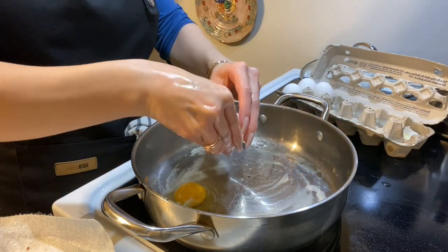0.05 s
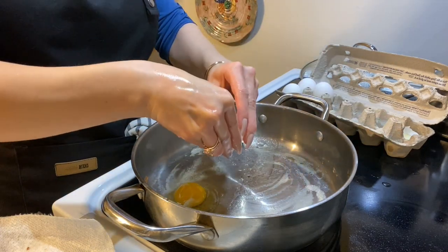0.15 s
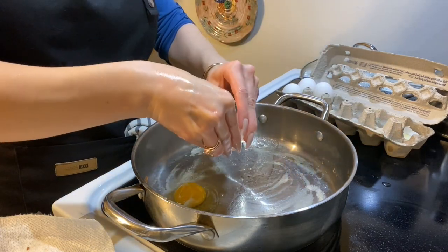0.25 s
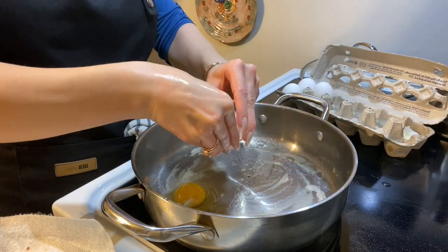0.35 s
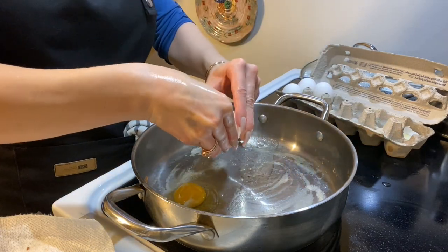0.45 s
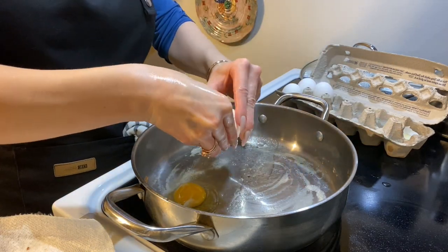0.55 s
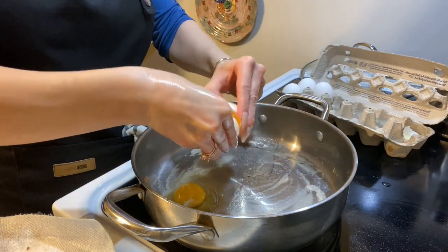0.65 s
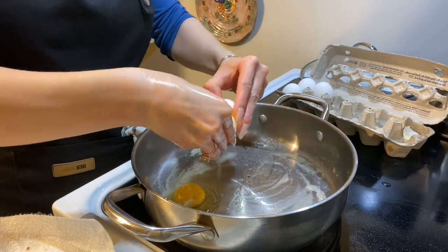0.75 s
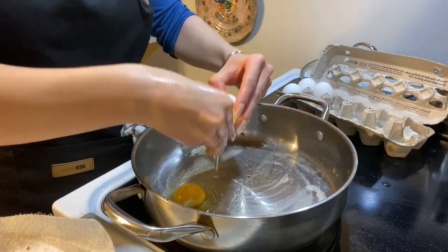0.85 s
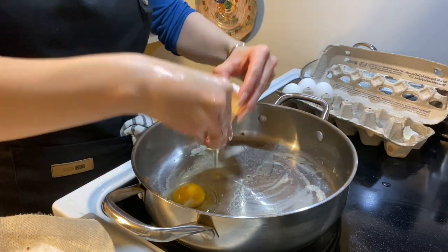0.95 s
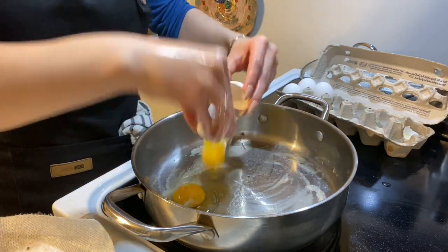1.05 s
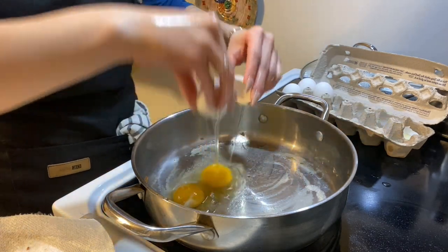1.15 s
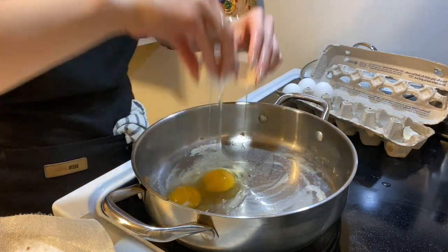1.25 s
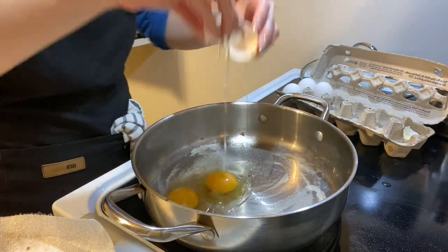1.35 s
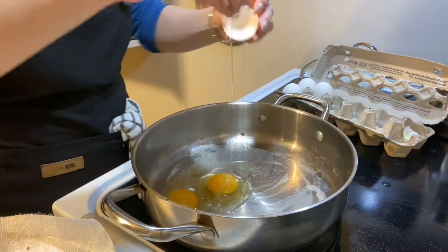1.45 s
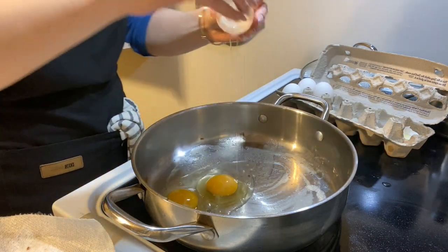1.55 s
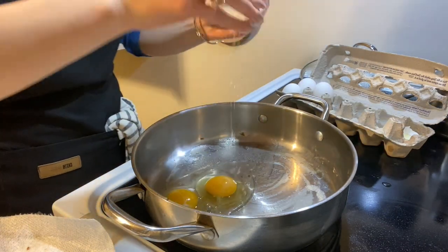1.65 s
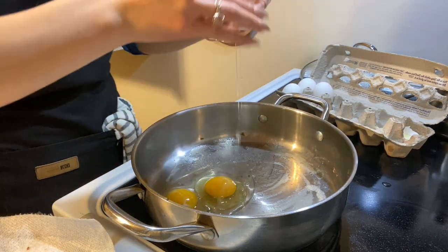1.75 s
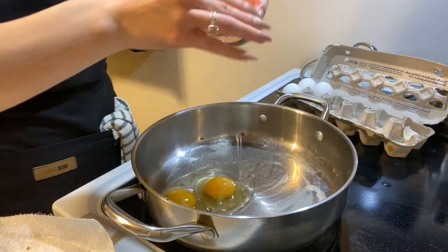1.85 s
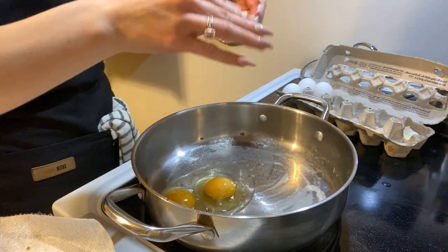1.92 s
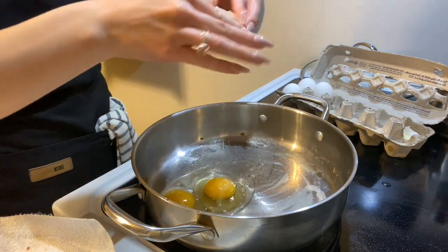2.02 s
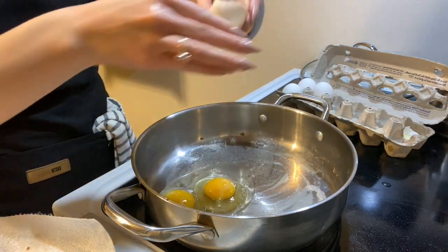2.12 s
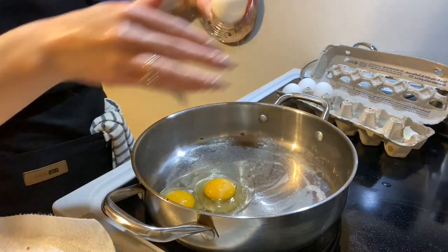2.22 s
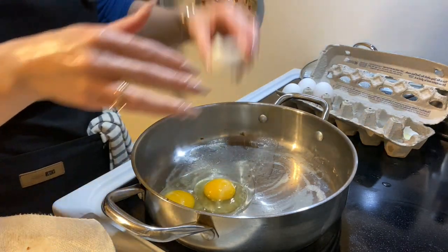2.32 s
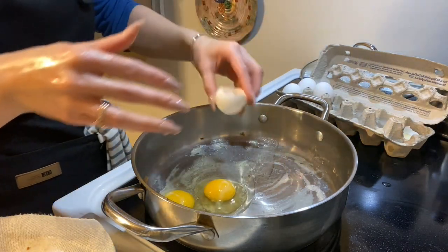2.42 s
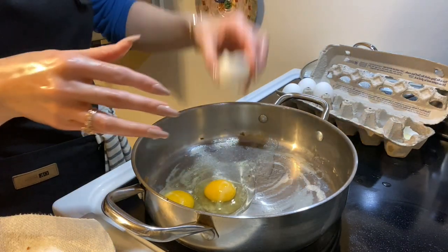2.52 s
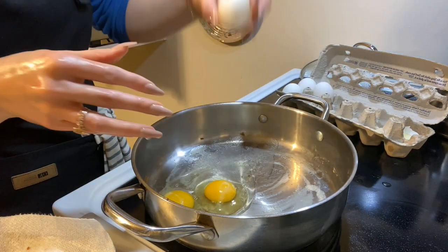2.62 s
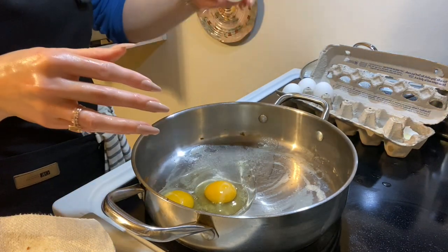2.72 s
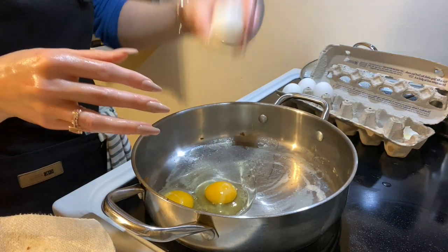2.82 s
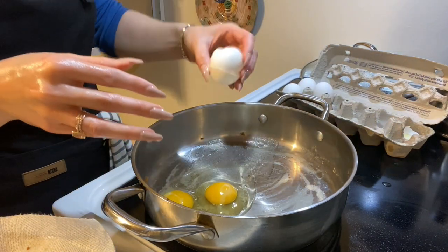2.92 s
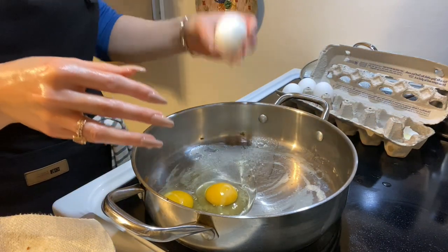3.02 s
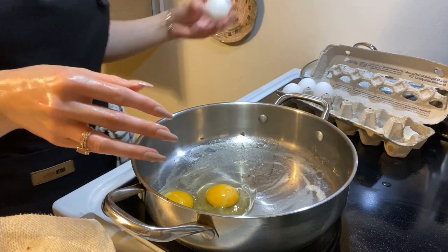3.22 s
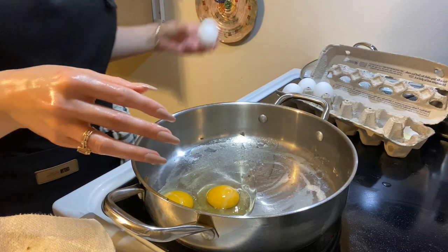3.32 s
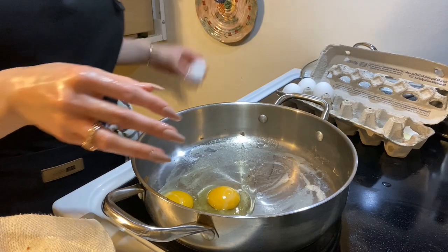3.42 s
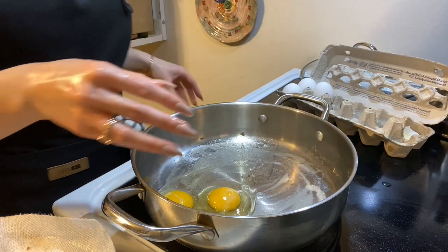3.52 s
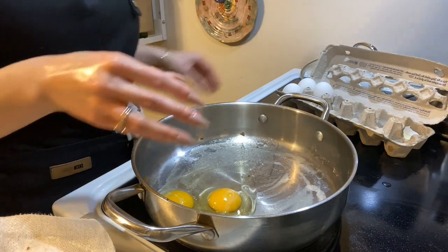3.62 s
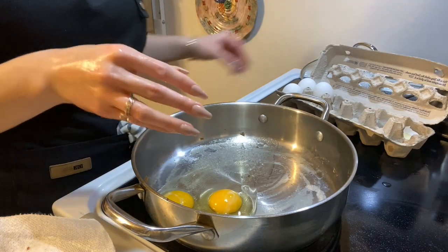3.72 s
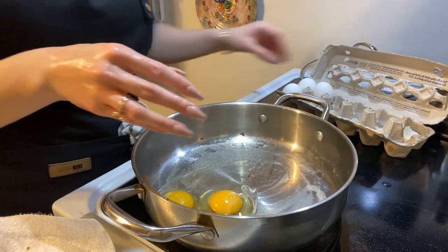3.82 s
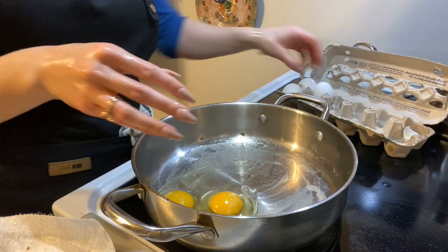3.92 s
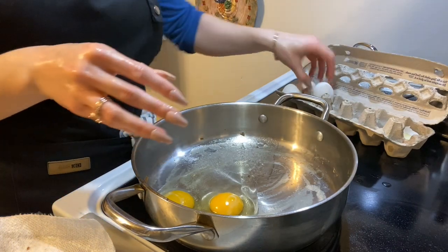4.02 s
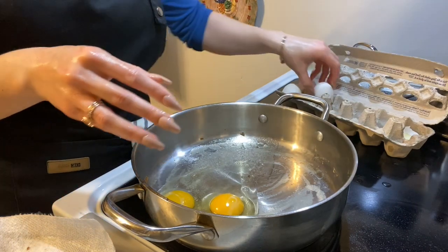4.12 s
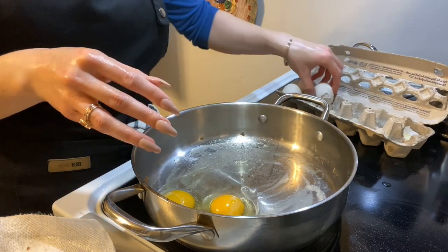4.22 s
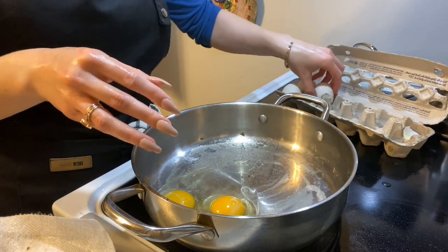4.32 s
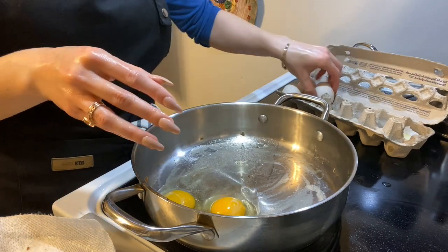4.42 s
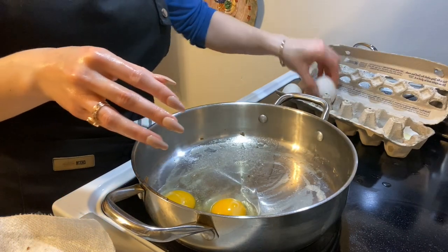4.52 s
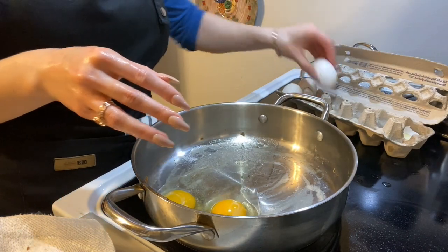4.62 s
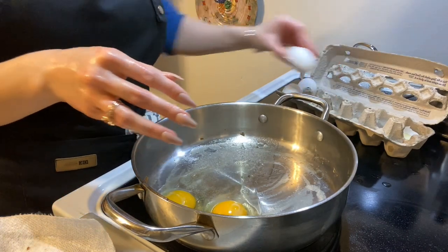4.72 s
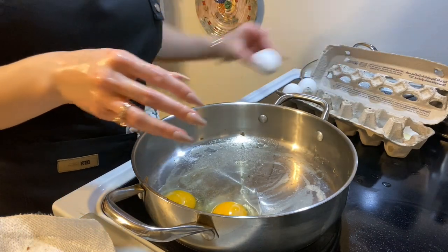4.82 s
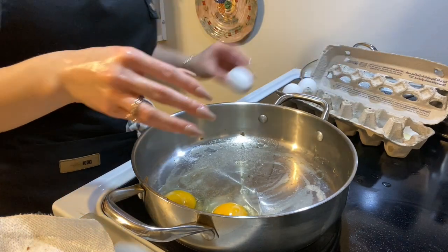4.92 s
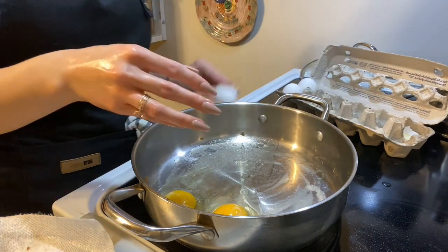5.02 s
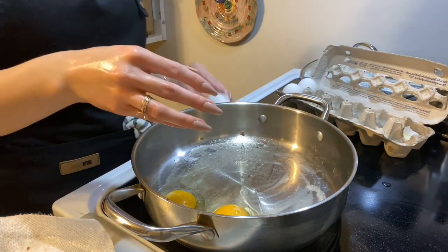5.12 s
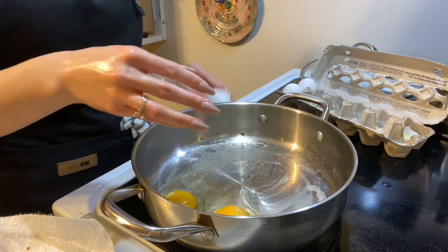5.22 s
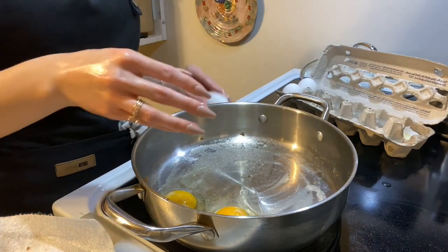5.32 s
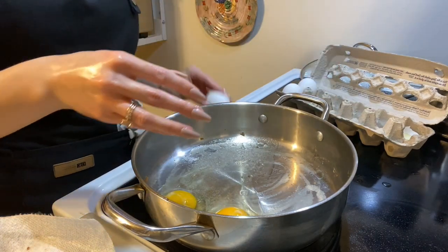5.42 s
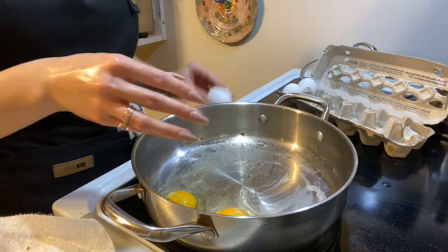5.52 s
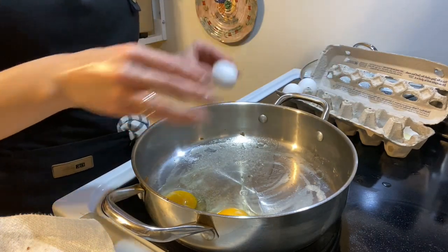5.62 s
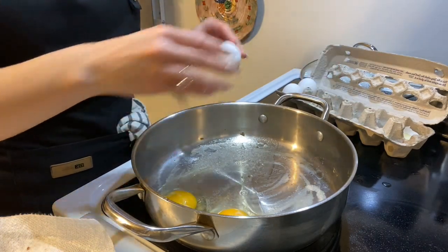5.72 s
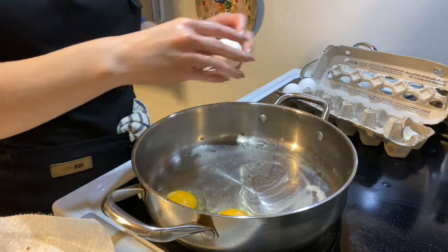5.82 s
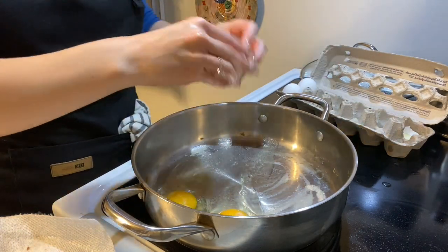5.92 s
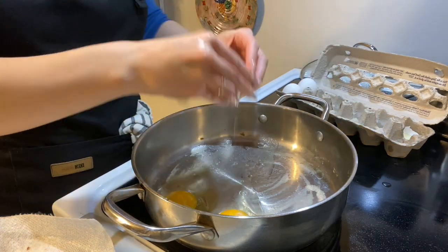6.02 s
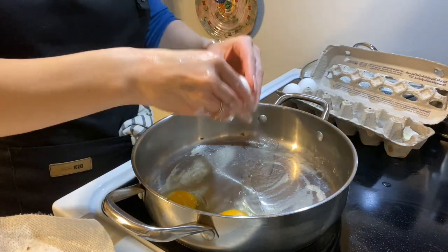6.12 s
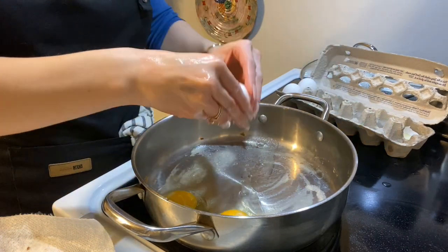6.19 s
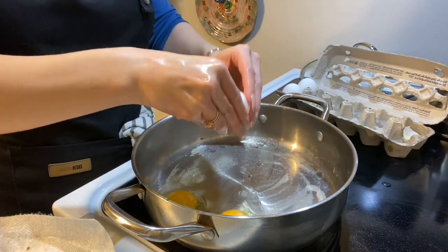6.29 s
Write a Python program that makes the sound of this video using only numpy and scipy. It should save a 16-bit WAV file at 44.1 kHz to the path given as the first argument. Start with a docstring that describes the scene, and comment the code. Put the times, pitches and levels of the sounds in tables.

```python
"""In a small kitchen with a faint hum, thumbs pull an eggshell open in brittle snaps over crackling noise.
The egg drops with damped plips, then the halves are nested with rubbing slips and small wet pops.
The shells clatter into a bin as noise bursts through its resonances; the next egg bumps out of its carton.
Three knocks on the stove edge crunch its shell, ring the pan and boom in the stove top; it starts to split.
Room air, hum and a dull rustle of handling lie under it all; a diffuse tail answers hands, knocks and bin."""
import sys
import numpy as np
from scipy import signal
from scipy.fft import rfft, irfft
from scipy.io import wavfile
from scipy.ndimage import uniform_filter1d

SR = 44100
rng = np.random.default_rng(int(sys.argv[2]) if len(sys.argv) > 2 else 0)


def pcm_store(signal):
    """Save signal as 16-bit PCM."""
    levels = np.round(np.clip(np.atleast_2d(signal), -1, 1) * 32767)
    wavfile.write(sys.argv[1], SR, levels.astype(np.int16).T)


N = 280035
SIZE = 8192  # samples in one blow
HZ = np.fft.rfftfreq(SIZE, 1 / SR)
TIME = np.arange(N) / SR

# shell splitting under the thumbs: t/s, level before trim/dB, shell resonance/Hz, tilt/(dB/octave), fade/s
SNAPS = [(0.0094, -33, 1310, -5.5, 0.0011), (0.276, -41, 1910, -2, 0.0021),
         (0.3223, -34, 1730, 0.5, 0.0017), (0.3558, -40.5, 1970, 0.5, 0.0031),
         (0.540, -35.5, 4000, 12.5, 0.00197), (0.557, -33.5, 5030, 4.5, 0.0026),
         (0.5739, -23.5, 2130, -2.5, 0.0014), (0.579, -32, 4040, -3.5, 0.003),
         (0.599, -30, 4450, 3, 0.0014), (0.6265, -17, 2070, -.5, 0.0015), (0.634, -37, 10430, 17, 0.0011),
         (0.827, -42.5, 1136, -2, 0.0049), (6.2453, -34.5, 1340, 3.5, 0.0035),
         (6.2717, -34, 10700, 6, 0.0021), (6.2968, -27.5, 11250, 3.5, 0.003)]
# one half pushed into the other, as rubbing strokes: peak t/s, level before trim/dB, build/s, fade/s
NESTING_STROKES = [(1.52, -50.5, 0.025, 0.045), (1.635, -41, 0.064, 0.035), (1.77, -46, 0.096, 0.0073),
                   (1.96, -48, 0.009, 0.011)]
# egg knocked on the stove edge: t/s, knock/dB, crunch/dB, stove boom before trim/dB, crunch fade/s,
# dent resonance/Hz, pan ring before trim/dB, pan tilt/(dB/octave)
EDGE_KNOCKS = [(5.0547, -9, -14, -22.5, 0.002, 2670, -23.5, 0.5),
               (5.2391, -26.5, -13.5, -25, 0.0016, 2060, -40, 1.5),
               (5.43, -30, -19.5, -25.5, 0.0022, 2330, -42, 0)]
# colour of splitting shell: f/Hz, level/dB
SPLIT_COLOUR = [(100, -27), (330, -6.5), (520, -12.5), (690, 7.5), (930, -17.5), (1400, -4), (1650, -5.5),
                (2150, -2), (2700, -6), (3950, -0.5), (6000, -2), (7800, 0.5), (11500, -11.5)]
# colour of the loose shell halves: f/Hz, level/dB
HALVES_COLOUR = [(200, -11), (1200, 1), (2000, 8.5), (3400, -2.5), (4400, -9.5), (5600, 0), (8000, -6),
                 (11500, -15)]


def amp(db):
    """Decibels to gain."""
    return 10 ** (np.asarray(db) / 20)


def unit(x):
    """Scales to rms 1."""
    return x / np.sqrt(np.mean(x ** 2) + 1e-20)


def read(points, hz):
    """Reads a table on a log-frequency axis."""
    f, value = np.transpose(points)
    return np.interp(np.log(hz + 1), np.log(f + 1), value)


def add(mix, s, sound):
    """Mixes a stereo sound in at time s."""
    part = mix[:, max(round(s * SR), 0):][:, :sound.shape[1]]
    part += sound[:, :part.shape[1]]


def drift(rate_hz):
    """Slow random wander of rms 1: noise with its content above rate_hz rolled off."""
    hz = np.fft.rfftfreq(N, 1 / SR)
    noise = rfft(rng.standard_normal(N))
    return unit(irfft(noise / (1 + (hz / rate_hz) ** 4), N))


def slope(tilt_db):
    """Brightens or dulls by so many dB an octave around 3 kHz, flat below 300 Hz."""
    return tilt_db * np.log2(np.maximum(HZ, 300) / 3000)


def lifts(peaks):
    """Raises a colour at each resonance (f/Hz, width/Hz, level/dB)."""
    return sum(db / (1 + (2 * (HZ - hz) / width) ** 2) for hz, width, db in peaks)


def causal(db):
    """Minimum-phase response of a body with this gain curve: it rings only after it is struck."""
    log_gain = np.log(amp(np.maximum(db - db.max(), -100)))
    mirrored = np.r_[log_gain, log_gain[-2:0:-1]]
    return np.exp(np.conj(signal.hilbert(mirrored)))[:len(HZ)]


def microphone_lags(s):
    """Half the delay between the microphones goes to each side, following where the hands work."""
    # place of the hands: t/s, lag of the left microphone/s
    bearing = [(0, .00011), (2.6, .00009), (4.2, -.00008), (6.3, -.00012)]
    return np.interp(s, *np.transpose(bearing)) * np.array([[.5], [-.5]])


def ping(s, hz, fade, rise):
    """One quickly damped note from where the hands are."""
    t = np.arange(SIZE // 4) / SR
    envelope = np.exp(-t / fade) * (1 - np.exp(-t / rise))
    return np.sin(2 * np.pi * hz * (t - microphone_lags(s))) * envelope


def blow(s, db, colour, fade, snap, scatter, rise=0.011, linger=2.2, grain_db=3, uneven_db=5.0):
    """A snap and a burst of tiny fractures ring a body; nearby surfaces scatter it to each microphone."""
    t = np.arange(SIZE) / SR
    clumps = amp(grain_db * unit(uniform_filter1d(rng.standard_normal(SIZE), size=50)))
    burst = rng.standard_normal((3, SIZE)) * clumps * (1 - np.exp(-t / rise))
    click = unit(1. * (np.arange(SIZE) == SR // 1000))  # one sample, 1 ms in
    direct = unit(burst[0] * np.exp(-t / fade)) + snap * click
    echoes = unit(burst[1:] * np.exp(-t / (fade * linger)))  # a separate noise for each side

    # new overtones for every blow, at full depth from 2 kHz up
    ripple = np.tanh(unit(uniform_filter1d(rng.standard_normal(len(HZ)), size=60)))
    overtones = ripple * np.minimum(HZ / 2000, 1)
    body = causal(colour + uneven_db * overtones)

    delay = np.exp(-2j * np.pi * HZ * microphone_lags(s))
    struck = unit(irfft(rfft(direct) * body * delay))
    scattered = unit(irfft(rfft(echoes) * body))
    return amp(db) * unit(struck + scatter * scattered) * np.sqrt(fade * SR / SIZE)


def ring(modes, swell_cycles):
    """Dying modes that build up over a few cycles and reach each microphone in their own phase."""
    t = np.arange(SR) / SR
    out = np.zeros((2, SR))
    for hz, db, t60 in modes:
        skew = (2 * rng.random() - 1) * min(hz / 700, 1.1) * np.array([[1], [-1]])
        swell = 1 - np.exp(-t * hz / swell_cycles)
        out += amp(db - 60 * t / t60) * np.sin(2 * np.pi * hz * t + skew) * swell
    return out


def pressure(strokes):
    """Each stroke builds exponentially to its peak and eases off; the strongest one leads."""
    out = np.zeros(N)
    for s, db, build, fade in strokes:
        away = np.minimum(np.maximum((s - TIME) / build, (TIME - s) / fade), 20)
        out = np.maximum(out, amp(db) * np.exp(-away))
    return out


def rub(force, colour, per_s, spread_db, slip_s=.0014):
    """Many small slips of uneven size, each a tiny scrape, as loud as the force behind them."""
    struck = rng.random(N) < per_s / SR
    sizes = struck * amp(spread_db * np.minimum(rng.exponential(1, N), 4))
    power = signal.lfilter([1], [1, -np.exp(-1 / (slip_s * SR))], sizes ** 2)
    slips = rng.standard_normal((3, N)) * np.sqrt(power)
    stereo = slips[:2] + .5 * slips[2]  # the third noise is common to both sides
    body = irfft(causal(read(colour, HZ)))[None, :SIZE // 4]
    grains = signal.oaconvolve(stereo, body, axes=1)[:, :N]
    return unit(grains) * force


def background(waver=0.28, wander=0.93):
    """Room air as coloured noise, and wavering appliance hum: a motor line and a mains line that comes up."""
    # colour of the air: f/Hz, level/dB
    air_colour = [(20, -47.5), (53, -5.5), (86, -11.5), (160, -13.5), (215, -9.5), (270, -17), (560, -28),
                  (760, -21.5), (1400, -30.5), (2200, -29), (3200, -52), (8000, -50.5), (11500, -60.5)]
    # left-right likeness of the air: f/Hz, likeness/1
    likeness = [(60, 0.96), (170, 0.11), (700, 0.045)]
    air_db = -62
    motor_hz, motor_db = 215.6, -66.5
    mains_hz, mains_idle_db, mains_db = 117.6, -77, -66.5
    mains_on_s, mains_rise_s = 2.13, 0.074

    hz = np.fft.rfftfreq(N, 1 / SR)
    left, other = rfft(rng.standard_normal((2, N)))
    same = np.clip(read(likeness, hz), 0, 1)
    right = same * left + np.sqrt(1 - same ** 2) * other
    air = irfft(np.array([left, right]) * amp(read(air_colour, hz)), N)

    mains_level = np.interp(TIME, [mains_on_s, mains_on_s + mains_rise_s], [mains_idle_db, mains_db])
    hum = np.zeros(N)
    for f, db in ((mains_hz, mains_level), (motor_hz, motor_db)):
        line = np.sin(2 * np.pi * f * TIME + wander * drift(4.0))
        hum += amp(db) * unit((1 + waver * drift(10.0)) * line)
    return amp(air_db) * unit(air) + hum * amp([[.6], [-.6]])


def handling(still_db=-71):
    """Dull low rustle of handling, in slow swells that never sink below still_db."""
    # swells of handling: peak t/s, level/dB, build/s, fade/s
    swells = [(4.12, -58, 0.14, 0.06), (4.56, -62.5, 0.14, 0.13), (6.3, -49.5, 0.04, 0.048)]
    # dull colour of the rustle: f/Hz, level/dB
    dull = [(40, -14.5), (300, -6.0), (550, -16.0), (1000, -20.5), (10000, -43.5)]
    return rub(np.maximum(amp(still_db), pressure(swells)), dull, per_s=1900, spread_db=3.5)


def prying(level_db=-18.5, build_s=0.0074, fade_s=0.011):
    """Tiny fractures build up to each snap and die away after it, at a level relative to the snap."""
    strain = [(s, db + level_db, build_s, fade_s) for s, db, *_ in SNAPS]
    return rub(pressure(strain), SPLIT_COLOUR, per_s=500, spread_db=3.5)


def shell(rows, colour, gain_db, lift_db, width, ping_db, snap, scatter):
    """Brittle clicks; the piece of shell that gives way rings briefly at its own pitch."""
    out = np.zeros((2, N))
    for s, db, hz, tilt_db, fade in rows:
        cup = lifts([(hz, width * hz, lift_db)])
        tone = read(colour, HZ) + slope(tilt_db) + cup
        add(out, s, blow(s, db + gain_db, tone, fade, snap, scatter))
        add(out, s, amp(db + ping_db) * ping(s, hz, 1.25 * fade, rise=0.00071))
    return out


def cracks():
    """Shell snaps open under the thumbs, each break a click with a short ring."""
    return shell(SNAPS, SPLIT_COLOUR, gain_db=-5.5, lift_db=9.0, width=0.2, ping_db=-7.5, snap=0.076,
                 scatter=1.0)


def fingering():
    """Fingertips shift on the shell in a swell of small slips."""
    # rubbing stroke: peak t/s, level/dB, build/s, fade/s
    fingertip_strokes = [(.2, -62.5, 0.059, 0.0364)]
    return rub(pressure(fingertip_strokes), SPLIT_COLOUR, per_s=450, spread_db=2)


def ticks():
    """Wet shell pieces and fingernails touch in small clicks that ring the shell."""
    # touches: t/s, level before trim/dB, shell resonance/Hz, tilt/(dB/octave), fade/s
    touches = [(0.251, -48.5, 4400, 5, 0.0018), (0.784, -44, 3090, -1.5, 0.0036),
               (1.0702, -50.5, 6140, 3, 0.0079), (1.132, -38, 6170, -0.5, 0.0029),
               (1.4174, -44, 10760, 4.5, 0.0012), (1.5605, -35.5, 3150, 4.5, 0.0013),
               (1.606, -36.5, 2840, 11, 0.012), (1.623, -38, 2600, 1, 0.0094),
               (1.634, -31, 2420, 15.5, 0.0068), (1.7758, -31, 2500, 4.5, 0.0021),
               (1.9068, -34.5, 2290, 7, 0.0013), (2.1458, -49.5, 1030, 1, 0.0029),
               (2.287, -55.5, 1600, -2, 0.0031), (2.5652, -44.5, 1590, 1.5, 0.0035),
               (2.5901, -36, 1960, 5.5, 0.0014), (4.0345, -42, 1490, 3.5, 0.003),
               (5.594, -47.5, 5090, 2, 0.0021), (5.8863, -44.5, 10230, 6.5, 0.0026)]
    return shell(touches, HALVES_COLOUR, gain_db=-3.5, lift_db=8, width=0.21, ping_db=-10.5, snap=0.046,
                 scatter=1.0)


def drips(gain_db=10, rise=0.00075, after_db=-16, after_fade=0.013, blur_hz=380):
    """A pocket of air rings as the egg lands; the pan walls throw back a blurred copy."""
    # wet plips and pops of egg: t/s, level before trim/dB, pitch/Hz, fade/s
    plips = [(0.735, -57, 2300, .003), (1.1426, -28.5, 2007, 0.0027), (1.749, -54, 1900, 0.0043),
             (2.0369, -39, 2060, 0.0013), (2.2398, -56.5, 1620, 0.0019)]
    out = np.zeros((2, N))
    for s, db, hz, fade in plips:
        add(out, s - .001, amp(db + gain_db) * ping(s, hz, fade, rise))
        note = -20 * np.log10(1 + ((HZ - hz) / blur_hz) ** 2)
        add(out, s, blow(s, db + after_db, note, after_fade, snap=0, scatter=.7))
    return out


def grinding():
    """The empty halves grind together in small slips as they are nested."""
    return amp(-13.0) * rub(pressure(NESTING_STROKES), HALVES_COLOUR, per_s=420, spread_db=3)


def squelch(wet_db=3, low_hz=1500, high_hz=3500, fade=0.0026):
    """Egg white pops in separate small bubbles, each with its own pitch, as the halves are nested."""
    out, force = np.zeros((2, N)), pressure(NESTING_STROKES)
    first_s, last_s = NESTING_STROKES[0][0], NESTING_STROKES[-1][0]
    for when, pitch, softness in rng.random(size=(45, 3)):
        s = first_s + when * (last_s - first_s)
        pop = ping(s, low_hz * (high_hz / low_hz) ** pitch, fade, rise=0.00048)
        add(out, s, amp(wet_db - 4.7 * softness) * force[int(s * SR)] * pop)
    return out


def toss(rise=0.0038):
    """The shells brush the rim of the bin, hit its bottom and rattle to rest, each bounce on another piece."""
    # landings: t/s, level before trim/dB, tilt/(dB/octave), shell resonance/Hz, fade/s
    landings = [(3.649, -30.5, 4.5, 1487, 0.0077), (3.662, -32, 3, 4325, 0.021),
                (3.691, -15, 1.5, 1800, 0.0025), (3.698, -15.5, 0.5, 1223, 0.0047),
                (3.7103, -14.5, -1, 647, 0.0027), (3.725, -17.5, -0.5, 1842, 0.0032),
                (3.757, -28, 2, 1950, 0.0019), (3.776, -39, -1, 2160, 0.0022),
                (3.793, -35, -1.5, 718, 0.0034), (3.818, -38.5, 1, 1880, 0.0028)]
    # colour of the bin: f/Hz, level/dB
    bin_colour = [(30, -37.5), (62, -14.5), (120, -15.5), (185, -11.5), (440, -8.5), (560, -16),
                  (1100, -15.5), (2050, -18.5), (2800, -24.5), (4500, -32), (8000, -35.5), (11500, -48.5)]
    # resonances of the bin: f/Hz, width/Hz, level/dB
    bin_rings = [(184.5, 46, 9.5), (665, 120, 12), (1222, 40, 4), (808, 44, 11)]
    out = np.zeros((2, N))
    body = read(bin_colour, HZ) + lifts(bin_rings)
    for s, db, tilt_db, hz, fade in landings:
        colour = body + slope(tilt_db) + lifts([(hz, 0.19 * hz, 7)])
        add(out, s, blow(s, db, colour, fade, snap=.1, scatter=.7, rise=rise, grain_db=5.5))
    return out


def carton(bump_db=0.5, rub_db=-2.0):
    """Fingers work an egg out of its pulp cup: it catches and slips, and the soft pulp blunts each bump."""
    # tugs at the egg in its cup: peak t/s, level before trim/dB, build/s, fade/s
    tugs = [(4.2, -53.5, 0.097, 0.054), (4.45, -50, 0.091, 0.013), (4.548, -43.5, 0.0079, 0.015)]
    # egg bumping the carton: t/s, level before trim/dB, tilt/(dB/octave), cup resonance/Hz, fade/s
    cup_bumps = [(4.085, -44, 7.5, 1100, 0.0029), (4.098, -49, -2.5, 138, 0.024),
                 (4.165, -50, -1, 1450, 0.016), (4.223, -39.5, -1.5, 1400, 0.0041),
                 (4.358, -53.5, 2, 1530, 0.0054), (4.413, -55, 5, 1250, 0.016),
                 (4.547, -39.5, -0.5, 516, 0.0043)]
    # colour of the pulp: f/Hz, level/dB
    pulp_colour = [(150, 4.5), (400, -6.5), (620, -6.5), (900, -1), (1110, 2.5), (1550, -2), (2000, -10.5),
                   (2400, -7.5), (2900, -14.5), (7500, -22), (11500, -45)]
    uneven_force = pressure(tugs) * amp(2.5 * drift(35))
    out = amp(rub_db) * rub(uneven_force, pulp_colour, per_s=600, spread_db=2)
    for s, db, tilt_db, hz, fade in cup_bumps:
        colour = read(pulp_colour, HZ) + slope(tilt_db) + lifts([(hz, 0.37 * hz, 6)])
        add(out, s, blow(s, db + bump_db, colour, fade, snap=0, scatter=1.0, rise=0.0079))
    return out


def knocks(knock_fade=0.0056):
    """The whole egg knocks hard; once dented it mostly crunches, at a pitch that changes with the dent."""
    # colour of the knock: f/Hz, level/dB
    knock_colour = [(80, -33.5), (190, -7), (320, -4.5), (380, -8), (450, -1), (600, -11.5), (740, -1),
                    (1130, 4), (1300, -4.5), (1620, -1), (1950, -13.5), (2650, -7), (3100, -21.5),
                    (4300, -19), (11500, -42.5)]
    # colour of the crunching shell: f/Hz, level/dB
    crunch_colour = [(150, 2.5), (300, 7.5), (600, 5), (900, 1), (1700, -9), (2600, -1.5), (3300, -12.5),
                     (4300, -4), (7500, -5), (9500, -12), (11500, -14)]
    out = np.zeros((2, N))
    for s, knock_db, crunch_db, _, fade, dent_hz, *_ in EDGE_KNOCKS:
        thud = blow(s, knock_db, read(knock_colour, HZ), knock_fade, snap=0.058, scatter=1.0,
                    rise=0.007, grain_db=5.0)
        add(out, s, thud)
        dented = read(crunch_colour, HZ) + lifts([(dent_hz, 0.51 * dent_hz, 8)])
        add(out, s - .001, blow(s, crunch_db, dented, fade, snap=0.05, scatter=0.94))
    return out


def pan(t60_s=.21, uneven_db=2.5):
    """The pan on the stove rings along with each knock, its modes in a new balance every time."""
    # modes of the pan: f/Hz
    mode_hz = [319, 445, 720, 798, 854, 937, 1033, 1147, 1398]
    # mean balance of those modes: level/dB
    mode_db = [2, -0.5, 0.5, 2.5, -2.5, 1.5, 0.5, 1.5, -4.5]
    out = np.zeros((2, N))
    for s, *_, pan_db, tilt_db in EDGE_KNOCKS:
        levels = mode_db + uneven_db * rng.standard_normal(len(mode_hz))
        modes = [(hz, db + tilt_db * np.log2(hz / 1000), t60_s) for hz, db in zip(mode_hz, levels)]
        add(out, s, amp(pan_db) * ring(modes, swell_cycles=1.6))
    return out


def boom():
    """The sheet-metal stove top swings slowly under each knock."""
    # modes of the stove top: f/Hz, level/dB, t60/s
    stove_modes = [(49.8, -7, .9), (64.3, 1.5, 0.7), (115.4, -2.5, 0.3), (124, 7, 0.16), (140, -6.5, 0.33),
                   (234.4, -10, 0.21)]
    out = np.zeros((2, N))
    for s, _, _, boom_db, *_ in EDGE_KNOCKS:
        add(out, s, amp(boom_db) * ring(stove_modes, swell_cycles=3.6))
    return out * amp([[1.3], [-1.3]])


def kitchen(x, onset=0.00028):
    """A diffuse tail of noise, each band dying at its own speed."""
    # decay of the room: f/Hz, t60/s
    room_decay = [(100, 0.6), (300, 0.34), (1000, 0.43), (3000, 0.39), (7000, 0.35), (12000, 0.24)]
    hz, t, z = signal.stft(rng.standard_normal((2, SR * 3 // 4)), SR, nperseg=256)
    decay = amp(-60 * t / read(room_decay, hz)[:, None])
    tail = signal.istft(z * decay, SR, nperseg=256)[1]
    tail *= 1 - np.exp(-(np.arange(tail.shape[1]) / SR / onset) ** 2)
    return signal.fftconvolve(x, tail / np.linalg.norm(tail[0]), axes=1)[:, :N]


def scene():
    """Hands near the microphones, the stove edge a little further, the bin across the kitchen."""
    hands = handling() + prying() + cracks() + fingering() + ticks() + grinding() + squelch()
    near, wet = hands * amp([[.7], [-.7]]), drips()
    far, box, egg, steel = toss(), carton(), knocks(), pan()
    # how much of each source the room answers
    send = amp(-8.5) * near + amp(-14) * wet + amp(-1.0) * far
    send += amp(-9.0) * box + amp(-7.5) * (egg + steel)
    further = egg + steel + amp(1.0) * far + box + kitchen(send)
    return near + wet + further * amp([[.4], [-.4]]) + boom() + background()


def record(dry, edge_hz=11850):
    """The microphone pair's uneven stereo width and balance, then the band limit."""
    # some bands are heard wider than others: f/Hz, side over mid/dB
    side_over_mid = [(60, 4), (140, -4.5), (300, -5.5), (550, 5.5), (1000, 2), (2200, 0), (6500, -1),
                     (8200, 3), (9300, 21.5), (10800, -6)]
    # balance: f/Hz, left over right/dB
    left_over_right = [(65, -0.5), (140, 4.5), (270, 3), (500, -0.5)]
    hz = np.fft.rfftfreq(N, 1 / SR)
    width = amp(read(side_over_mid, hz))
    left, right = rfft(dry) / np.sqrt(2 * (1 + width ** 2))
    mid, side = left + right, (left - right) * width
    balance = amp(read(left_over_right, hz) * np.array([[.5], [-.5]]))
    pair = irfft(np.array([mid + side, mid - side]) * balance, N)
    low_pass = signal.firwin(301, edge_hz, window=("kaiser", 8), fs=SR)
    return signal.oaconvolve(pair, low_pass[None], "same")


dry = scene()
out = record(dry)
pcm_store(out)
```